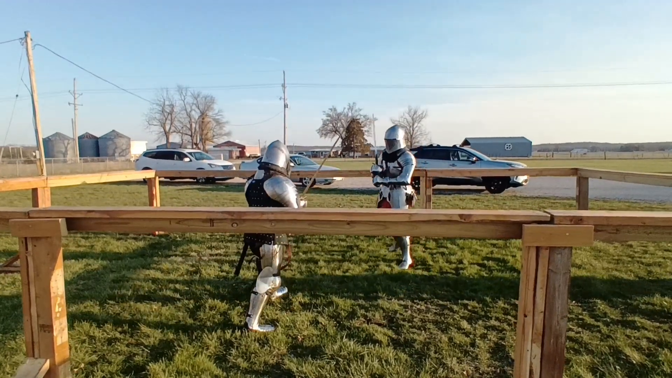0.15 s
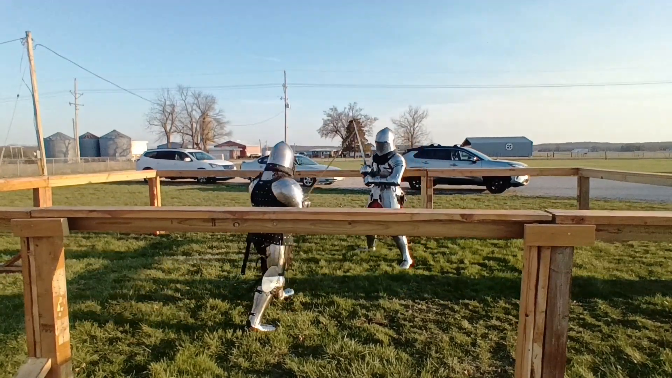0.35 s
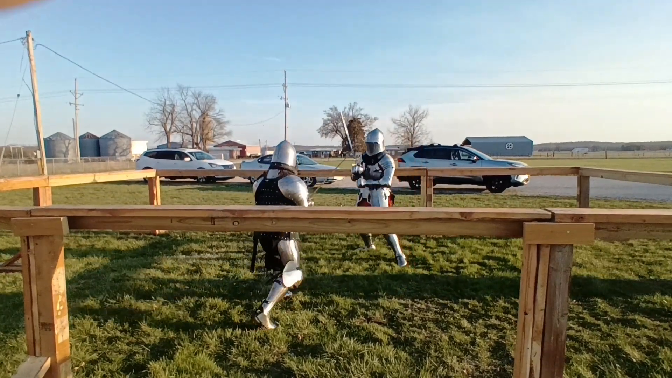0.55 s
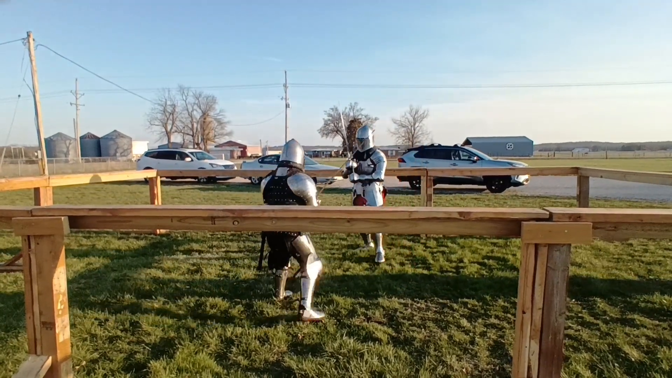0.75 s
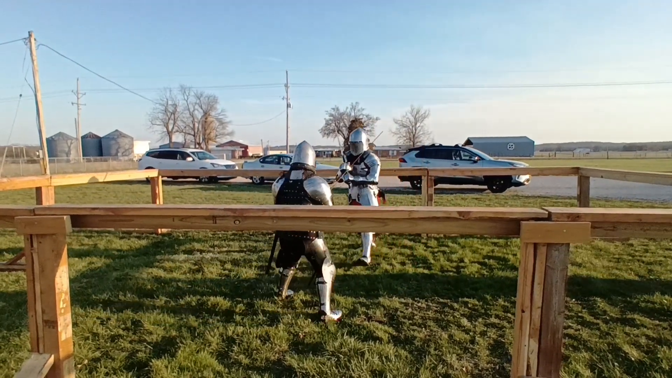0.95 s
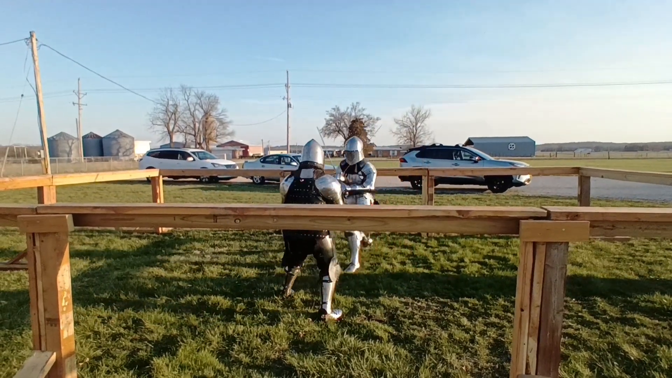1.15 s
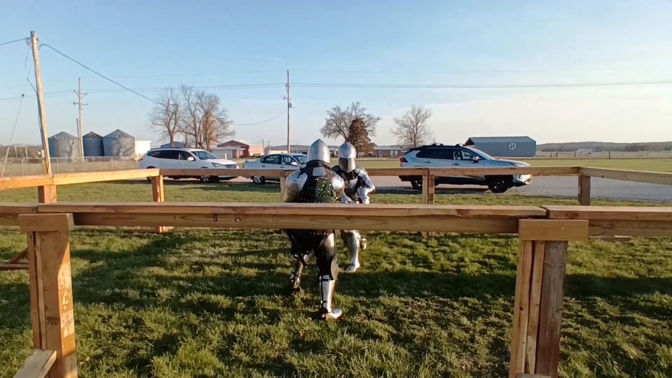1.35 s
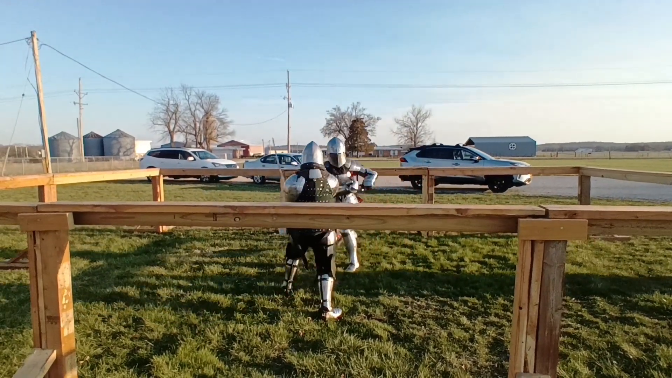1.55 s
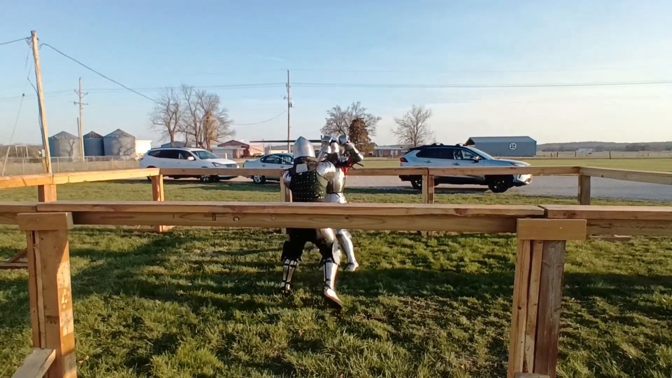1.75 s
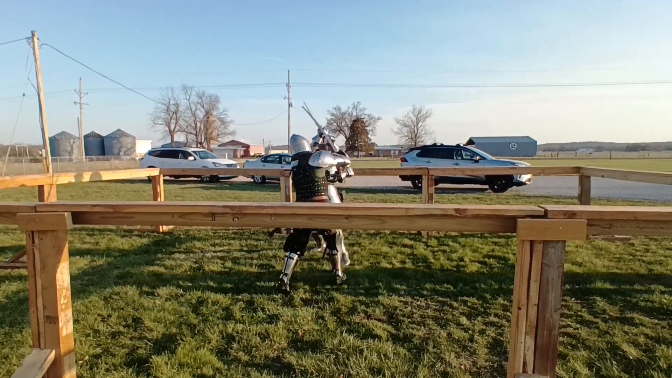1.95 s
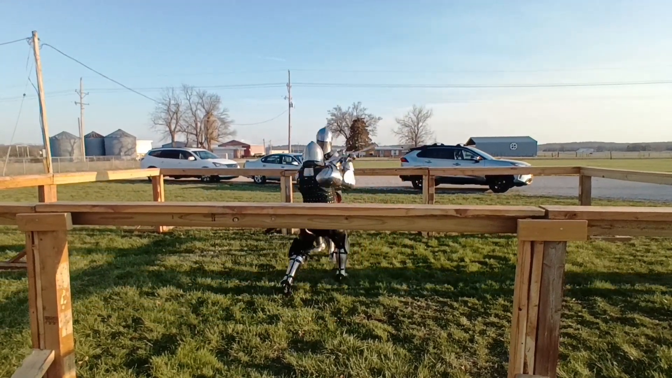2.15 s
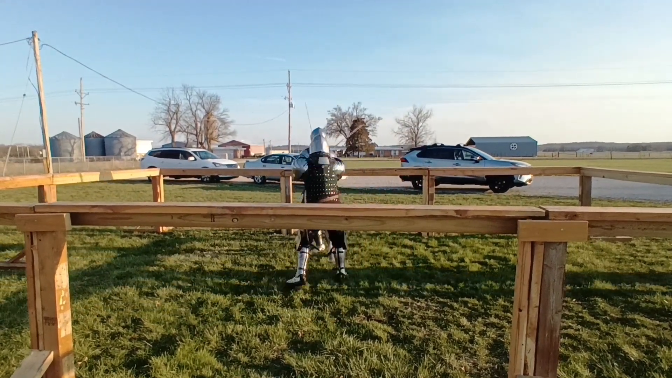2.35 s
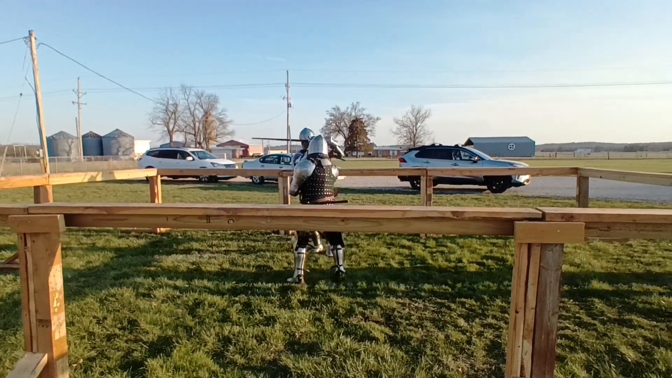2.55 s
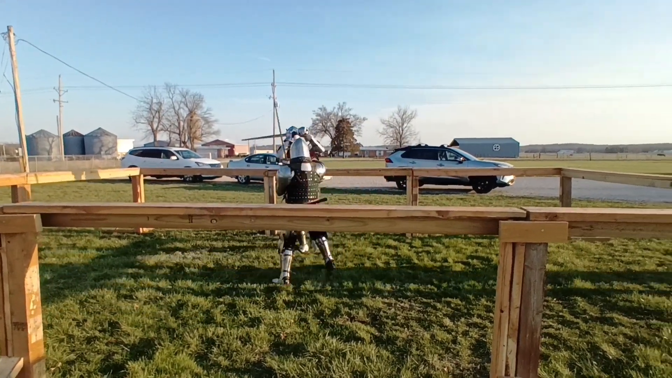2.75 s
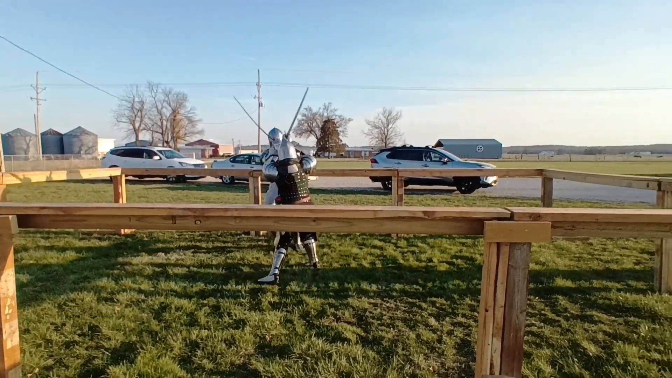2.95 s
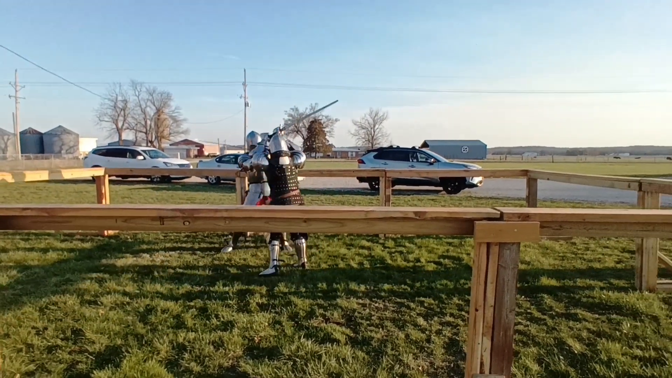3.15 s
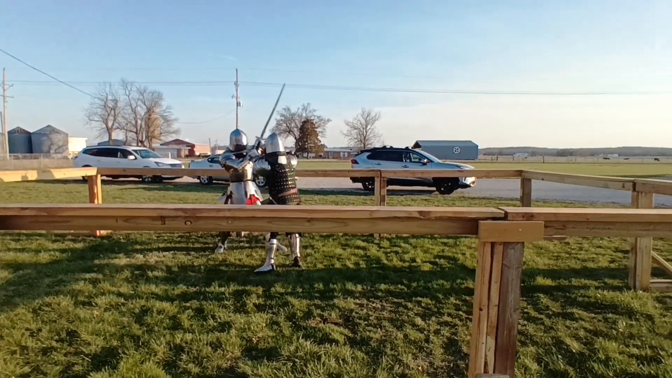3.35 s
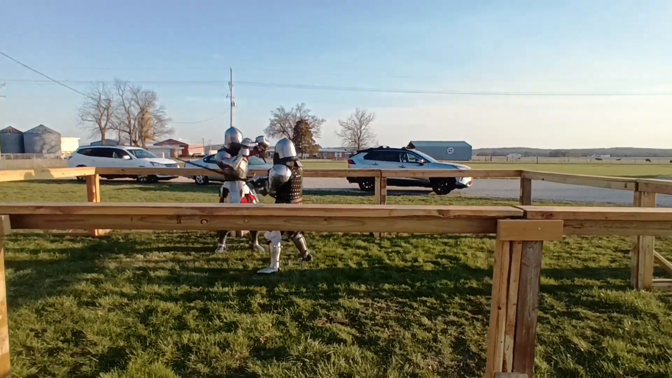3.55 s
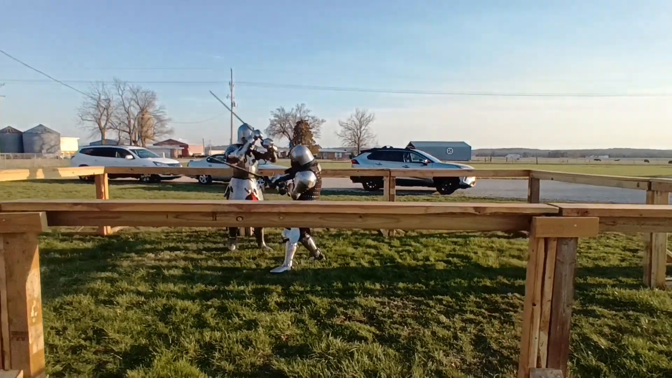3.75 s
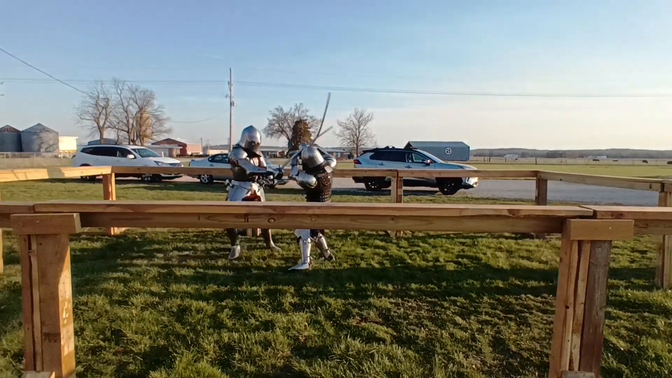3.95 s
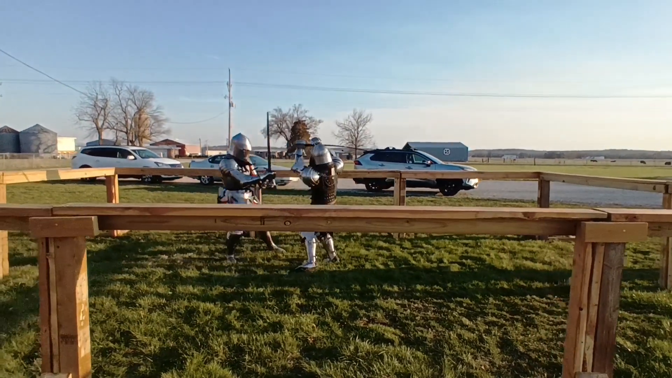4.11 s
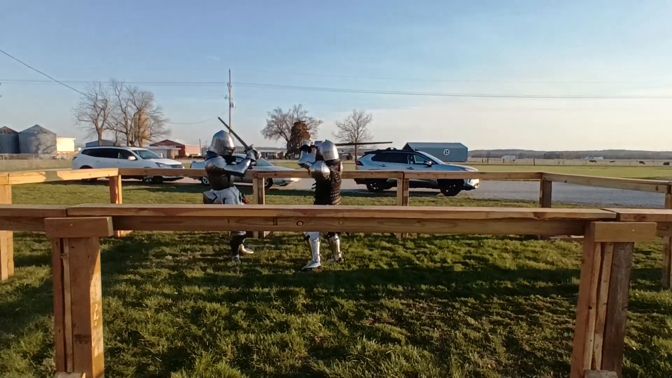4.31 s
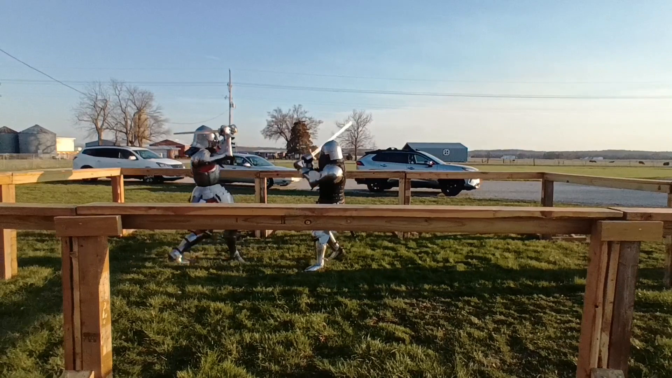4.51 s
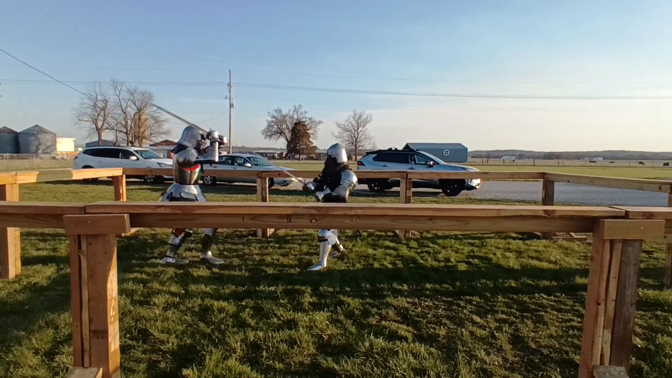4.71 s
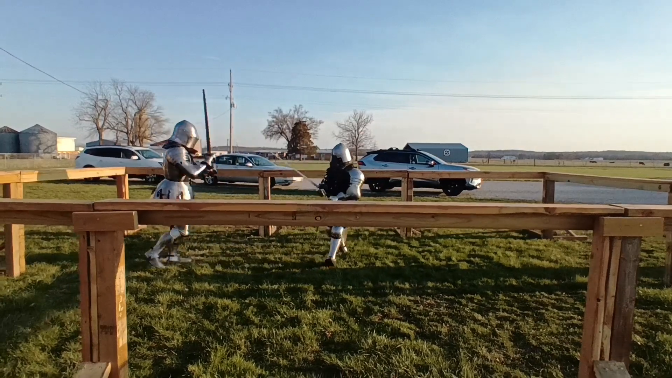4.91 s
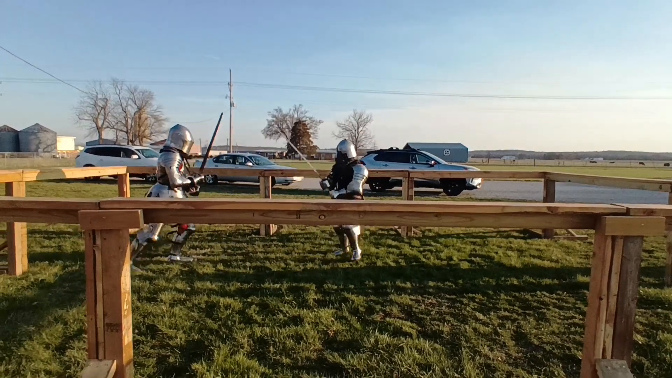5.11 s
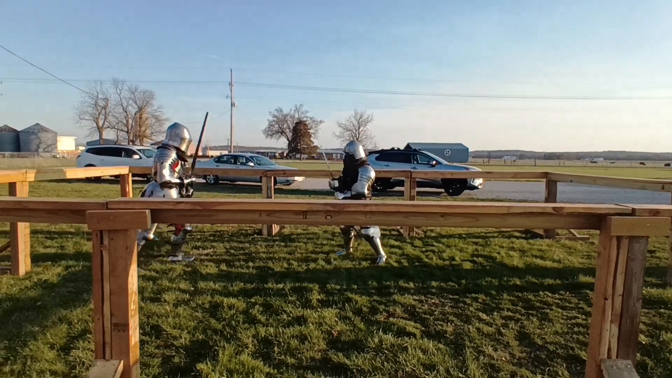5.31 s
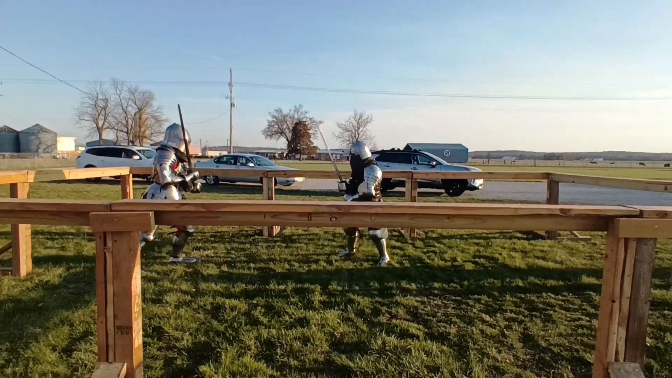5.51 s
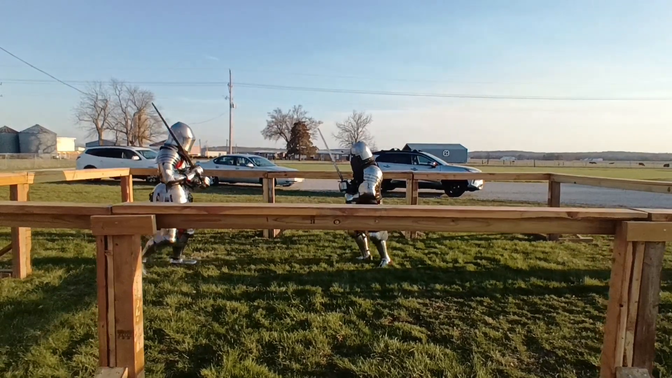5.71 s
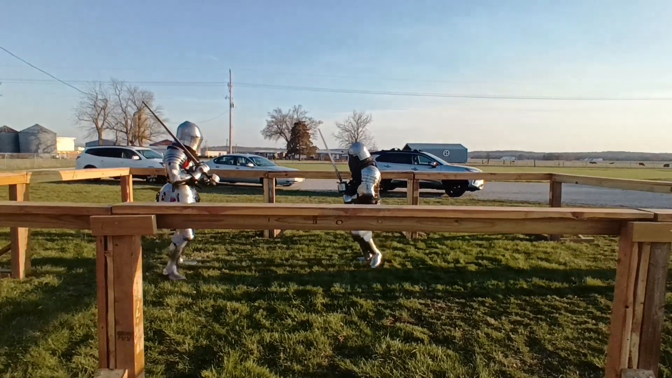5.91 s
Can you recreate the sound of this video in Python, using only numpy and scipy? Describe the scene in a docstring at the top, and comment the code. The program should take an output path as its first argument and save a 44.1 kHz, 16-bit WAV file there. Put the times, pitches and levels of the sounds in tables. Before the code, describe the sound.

Two people in steel armour fight with swords a few metres away on open grass. Light quick clinks start, a short lull of wind follows, then hard clashes and plate knocks crowd together, hardest around two seconds. Another dense flurry comes near four, a faint blade whine follows, and strikes thin out. Mail rustles throughout; handheld phone with low wind buffeting either side.

```python
"""Steel armour rustles and sword blades clash: two fighters spar on an open field, a few metres from a phone.
Mail, plates and buckles are flickering noise and short tones; blows are noise bursts through ringing modes.
Knocks wake the plates, small parts ring as fading sines, and a blade sliding on a plate whines on two partials.
Gusts of low noise and single pops buffet the two microphone ports one at a time.
The phone's gain dips just ahead of sudden loud sounds."""
import sys
import numpy as np
from scipy import signal
from scipy.fft import rfft, irfft, next_fast_len
from scipy.io import wavfile
from scipy.ndimage import uniform_filter1d, minimum_filter1d, map_coordinates

SR = 44100
rng = np.random.default_rng(int(sys.argv[2]) if len(sys.argv) > 2 else 0)


def to_wav(sig):
    """Store sig (one row per channel, or 1-D mono) as 16-bit WAV at the path in sys.argv[1].

    Samples outside -1..1 are clipped; the rate is SR.
    """
    pcm = np.clip(np.atleast_2d(sig), -1, 1) * 32767
    pcm = np.round(pcm).astype(np.int16)
    wavfile.write(sys.argv[1], SR, pcm.T)  # frames by channels


N = 267687

# how hard the armour moves: [t/s, mail level/dB, plates over mail/dB]
ARMOUR_MOTION = [(0, -29, -3), (0.1, -46, 4), (0.36, -58.5, -11), (0.6, -38, -12), (0.99, -46.5, -20),
                 (1.25, -37, -21.5), (1.51, -21, -9), (1.61, -30, -11), (2.06, -29, -14),
                 (2.25, -31.5, -13.5), (2.5, -19, -16.5), (2.83, -38, -16.5), (2.94, -33, -22.5),
                 (3.28, -34, -17.5), (3.42, -30, -20.5), (3.72, -36, -11.5), (3.85, -44, -3),
                 (4.02, -30, -12), (4.33, -30.5, -5.5), (4.48, -40, -12), (4.82, -32, -5), (4.95, -37, -10),
                 (5.28, -41.5, -23), (5.42, -49.5, -13.5), (5.88, -50.5, -15.5), (6.06, -45, -22.5)]
# padded bodies rub together in the grapple: [start t/s, rise/s, fall/s, top level/dB]
BODY_SCUFFS = [(1.3, 0.18, 0.17, -49.5), (1.621, 0.046, 0.32, -42.5), (2.06, 0.1, 0.2, -36),
               (2.3, 0.072, 0.19, -48), (2.9, 0.24, .25, -49.5), (3.36, 0.077, 0.18, -46.5),
               (3.58, 0.091, 0.097, -56), (3.84, 0.11, 0.04, -39.5), (4.12, 0.076, 0.12, -57),
               (4.45, 0.064, 0.075, -57), (4.74, 0.048, 0.063, -46)]
# the highest treble of the rustle swells for a while: [start t/s, end t/s, added level/dB]
RUSTLE_TREBLE_SWELL = (3.36, 4.45, 16.8)
# steel on steel: [t/s, clash level/dB, glint over clash/dB, time to fade 60 dB/ms]
SWORD_BLOWS = [(0.0146, -21, -16, 390), (0.0847, -17.5, -12, 67), (0.18, -30, -62, 64),
               (0.242, -30, -31, 9.9), (0.29, -27.5, -13, 28), (0.307, -33, -15, 26),
               (0.451, -17.5, -25, 62), (0.4683, -15.5, -16, 36), (0.484, -22.5, -29, 35),
               (0.5489, -18.5, -21, 65), (0.5732, -21.5, -20, 110), (1.2059, -22, -47, 120),
               (1.336, -14.5, -50, 115), (1.3811, -3.5, -28, 270), (1.403, 3, -20, 93),
               (1.4212, -11, -25, 77), (1.6574, -13, -34, 210), (1.8608, -18, -46, 39),
               (1.9256, -0.5, -33.5, 75), (1.997, -12.5, -43, 120), (2.1298, -14.5, -44, 180),
               (2.158, -15, -38, 300), (2.1876, -13, -28, 25), (2.2067, 3.5, -29, 135),
               (2.222, -5, -43, 80), (2.24, -4, -48, 177), (2.253, -5.5, -44, 29), (2.282, 4.5, -39, 26),
               (2.2881, -11.5, -45, 33), (2.4509, 9.5, -26, 140), (2.4674, -6, -37, 90),
               (2.54, -9.5, -35, 130), (2.6195, -17, -60, 350), (2.7157, -23, -48, 63),
               (2.8695, -26, -8, 49), (2.9032, -13, -54, 78), (2.947, -20.5, -48, 50),
               (3.1204, -17, -16, 120), (3.314, -21, -28, 170), (3.3405, -13.5, -20, 150),
               (3.384, -16.5, -19, 330), (3.417, -10.5, -20, 88), (3.4344, -12, -21, 22),
               (3.479, -14, -17, 86), (3.5358, -16.5, -24, 40), (3.634, -12.5, -21, 36),
               (3.6729, -25, -29, 130), (3.6993, -14.5, -36, 46), (3.747, -20, -9, 100),
               (3.762, -28, -20, 13), (3.786, -14, -29, 253), (3.941, -18, -18, 59),
               (3.9792, -4, -14.5, 185), (3.9935, -2.5, -23, 62), (4.0167, -7.5, -27, 120),
               (4.029, -10, -20, 22), (4.0557, -11.5, -25, 110), (4.111, -13.5, -17, 17),
               (4.142, -12.5, -35, 28), (4.173, -14.5, -31, 210), (4.2927, -20.5, -13, 100),
               (4.344, -23, -33, 130), (4.451, -41, -22, 25), (4.569, -20, -30, 49),
               (4.6075, -15, -33, 110), (4.6372, -12, -33, 190), (4.6796, -17, -34, 124),
               (4.7, -14, -35, 240), (4.729, -12, -29, 35), (4.783, -14.5, -16.5, 340),
               (4.805, -13.5, -21, 140), (5.003, -14, -38, 160), (5.209, -17.5, -42, 160),
               (5.253, -23.5, -31, 220), (5.5243, -31.5, -35, 180), (5.5438, -32.5, -45, 170),
               (5.746, -34.5, -34, 46), (6.0152, -25, -33, 30), (6.0276, -15.5, -29, 15)]
# knocks on the plates: [t/s, level/dB, most woken f/Hz, time to fade 60 dB/ms]
PLATE_KNOCKS = [(0.016, -16.5, 830, 33), (0.065, -24, 810, 50), (0.179, -42, 2050, 100),
                (0.261, -39.5, 770, 125), (0.448, -28, 1730, 69), (0.469, -32, 2000, 30),
                (0.492, -30, 1900, 25), (0.544, -25, 790, 142), (0.672, -36.5, 1350, 90),
                (1.205, -28, 1780, 29), (1.381, -15.5, 1080, 40), (1.401, -7, 954, 68),
                (1.478, -24.5, 726, 105), (1.566, -17, 2270, 33), (1.687, -21, 2000, 36),
                (1.711, -24, 1970, 52), (1.866, -29, 916, 30), (1.925, -7, 764, 16.7),
                (2.2075, -3, 750, 26.4), (2.37, -17.5, 1730, 49), (2.45, -0.5, 2000, 36),
                (2.469, -8.5, 1890, 25), (2.613, -23, 2200, 110), (2.72, -30.5, 2300, 114),
                (2.902, -15, 670, 62), (2.947, -20, 850, 67), (3.121, -31, 1380, 250),
                (3.339, -31, 2420, 210), (3.39, -28, 2110, 330), (3.477, -29, 1080, 145),
                (3.786, -16, 920, 63), (3.812, -23.5, 830, 220), (3.939, -23.5, 2000, 60),
                (3.978, -20.5, 960, 99), (4.137, -20, 854, 83), (4.171, -18.5, 890, 117),
                (4.233, -25, 1960, 83), (4.291, -33, 830, 78), (4.366, -28.5, 815, 160),
                (4.639, -30.5, 2280, 310), (4.714, -21, 2200, 78), (4.786, -19, 680, 244),
                (4.829, -30.5, 680, 130), (4.999, -20.5, 1060, 68), (5.259, -39, 890, 340),
                (5.326, -36, 820, 24), (5.55, -45.5, 1880, 85), (5.748, -48.5, 774, 170),
                (5.949, -46, 820, 200)]
# wind on one microphone port: [start t/s, rise/s, fall/s, top level/dB, port L or R]
WIND_GUSTS = [(0.372, 0.059, 0.048, -26.5, "R"), (.47, 0.041, 0.19, -35.5, "R"), (.57, .05, 0.52, -42, "L"),
              (.64, 0.077, 0.34, -21.5, "R"), (.8, 0.24, 0.17, -23, "R"), (1.05, 0.19, .05, -50, "L"),
              (1.259, 0.068, 0.057, -26.5, "L"), (1.381, 0.19, 0.17, -20.5, "R"),
              (1.728, 0.11, 0.082, -33, "L"), (2.02, 0.11, 0.067, -39.5, "R"), (2.05, 0.13, .07, -49, "L"),
              (2.15, 0.041, 0.022, -45, "R"), (2.8, 0.037, 0.042, -48, "L"), (2.31, 0.061, 0.056, -23, "R"),
              (2.408, 0.06, 0.16, -38, "L"), (2.55, 0.22, .05, -59, "R"), (2.7, 0.13, 0.029, -28, "L"),
              (2.82, 0.23, 0.32, -18, "R"), (2.95, 0.18, 0.14, -47, "L"), (3.54, 0.15, 1, -27, "L"),
              (4.11, 0.024, 0.31, -43, "L"), (4.199, 0.095, 0.4, -38, "L"), (4.36, 0.18, 0.24, -19.5, "R"),
              (4.2, 0.08, 0.075, -44, "R"), (4.999, 0.28, 0.1, -24, "R"), (5.208, 0.089, 0.07, -30.5, "L"),
              (5.362, 0.032, 0.11, -27.5, "R"), (5.73, 0.076, 0.059, -35.5, "R"),
              (5.72, 0.056, 0.11, -58, "L"), (5.89, 0.057, 0.05, -47, "L"),
              (5.95, 0.054, 0.067, -33.5, "R")]
# small steel parts left ringing on one clear tone: [t/s, f/Hz, level/dB, time to fade 60 dB/s]
PART_PINGS = [(0.885, 3320, -59, 1), (1.008, 1920, -50, 0.2), (1.166, 1337, -45.5, 0.15),
              (3.812, 780.4, -35.5, 0.68), (3.812, 1410, -36, 0.29), (4.71, 2290, -26.5, 0.29)]
# pops of wind on the right port: [t/s, peak level/dB, length of the swing/ms]
WIND_POPS = [(0.977, -10.5, 3.46), (2.411, -15, 3.4), (2.865, -18, 4.8), (3.034, -24, 5.6),
             (3.084, -16.5, 3.3)]
# partials of the sliding blade, lowest first: [loudest t/s, level/dB, fade either side/(dB/s)]
WHINE_PARTIALS = [(4.72, -36, 80), (4.92, -38, 55)]
# the phone turns to follow the bout: [t/s, left port hears later by/ms]
PHONE_TURN = [(0, 0.026), (2.5, 0), (3.2, 0.13), (4.2, 0.13), (6.07, 0.18)]

# spectrum of the mail: [f/Hz, relative level per Hz/dB]
MAIL_COLOUR = [(1760, -36), (3000, -41), (4000, -10), (4490, -4.5), (6200, 4.5), (7030, -1.5), (8550, -25),
               (10000, -30.5), (13000, -41), (22000, -120)]
# spectrum of the armour plates: [f/Hz, relative level per Hz/dB]
PLATE_COLOUR = [(290, -48), (500, -8), (913, -1.5), (1090, -11.5), (1430, 0.5), (1710, -1), (1890, 4),
                (3500, -1.5), (4550, -30), (7700, -120)]
# spectrum of the padding under the armour: [f/Hz, relative level per Hz/dB]
PADDING_COLOUR = [(120, -32.5), (200, -28), (367, -4.5), (425, -9), (535, -25), (600, -26.5), (780, -69.5),
                  (1320, -120)]
# spectrum of the glint, the highest treble of the steel: [f/Hz, relative level per Hz/dB]
GLINT_COLOUR = [(5290, -58.5), (9000, -0.5), (10400, -2.5), (11800, -7.5), (13400, -12), (15100, 15),
                (16000, 1.5), (16400, -20)]
# spectrum of the broad crash of a blow: [f/Hz, relative level per Hz/dB]
CLASH_COLOUR = [(1530, -53.5), (2600, -11.5), (3470, -6), (3820, -1.5), (4310, -1.5), (4600, 3),
                (5260, -1.5), (6750, 6.5), (7060, -0.5), (8880, -27.5), (12000, -40), (15600, -53),
                (22000, -120)]
# spectrum of strong wind at a port: [f/Hz, relative level per Hz/dB]
WIND_COLOUR = [(25, -51.5), (70, -1), (118, -1), (172, -4.5), (213, -7.5), (242, -12), (452, -41),
               (500, -69), (650, -69), (1100, -120)]
# modes of the armour plates: [f/Hz, relative level/dB, time to fade 60 dB/s]
ARMOUR_MODES = [(776.3, -1, 0.19), (830, 6, 0.092), (916, -5, 0.13), (1080, 1, 0.049), (1211, -2.5, 0.17),
                (1372, 2, 0.12), (1743, 0, 0.12), (1851, -29, 0.041), (2000, 2, 0.053), (2273, 9.5, 0.1),
                (2300, -5, .035), (2848, 10.5, 0.08)]
# modes of the sword blades: [f/Hz, relative level/dB, time to fade 60 dB/s]
BLADE_MODES = [(3720, -3, .07), (3914, -2, .05), (4700, 3, .04), (5490, 5, .05), (5590, 5, .07),
               (6260, 6, .05), (6550, 7, .05), (6850, 12, .06), (7390, 5, .05), (7490, 3, .06)]

# glint and padding follow the motion: level at middle motion, dB gained per dB of motion
MOTION_MID_DB = -35
GLINT_MID_DB, GLINT_SLOPE = -66, 0.62
PADDING_MID_DB, PADDING_SLOPE = -69, 0.83
TREBLE_EDGE_S = 0.089
# small parts: rate, pitch range, mean ring time to -60 dB, level over mail
JINGLES_PER_S, JINGLE_LO_HZ, JINGLE_HI_HZ = 160, 1193, 7500
JINGLE_RING_S, JINGLE_OVER_MAIL_DB = 0.081, -10.5
# scatter of their strengths, widest difference between ports, rise with pitch
JINGLE_SPREAD_DB, JINGLE_PAN_DB, JINGLE_TILT_DB_PER_OCTAVE = 5.5, 23.5, 4.5
STUTTER_DB = 4  # roughness of the scrape in a blow
KNOCK_FOCUS_DB = 18  # how far a knock holds down modes away from its pitch
CALM_DB, SWELL_SHAPE = -68, 2.78  # air between gusts; exponent, higher makes narrower swells
# the whine as a blade slides along a plate
SLIDE_START_S, SLIDE_END_S, SLIDE_EDGE_S = 4.63, 5.28, 0.026
SLIDE_HZ, SLIDE_LIFT_HZ = 810, 70
TOP_HZ = 16100  # the phone passes nothing much above


def undb(db):
    """Decibels to gain."""
    return 10 ** (np.asarray(db) / 20)


def unit(x):
    """Scale to rms 1."""
    return x / np.sqrt(np.mean(x ** 2))


def curves(table):
    """Columns of a table as curves over time."""
    s, *columns = np.transpose(table)
    return [np.interp(np.arange(N) / SR, s, column) for column in columns]


def colour(points, size=2048):
    """Causal response with the given spectrum, from the folded cepstrum; white noise keeps its level."""
    hz, db = np.transpose(points)
    grid = np.maximum(np.arange(size // 2 + 1), 1) * SR / size
    slope_db = -24 * np.maximum(np.log2(grid / hz[-1]), 0)  # 24 dB per octave past the last point
    spectrum_db = np.interp(np.log(grid), np.log(hz), db) + slope_db
    cepstrum = irfft(np.log(undb(spectrum_db)))
    cepstrum[1:size // 2] *= 2
    cepstrum[size // 2 + 1:] = 0
    taps = irfft(np.exp(rfft(cepstrum)))
    return taps / np.sqrt(np.sum(taps ** 2))


def through(x, taps):
    """Both channels through one response."""
    return signal.fftconvolve(x, taps[None], axes=1)[:, :x.shape[1]]


def pair(size, alike):
    """Noise for both ports, with a share of its power in common."""
    noise = rng.standard_normal((3, size))
    return np.sqrt(alike) * noise[0] + np.sqrt(1 - alike) * noise[1:]


def walk(rate, size=N):
    """Random levels, one every 1 / rate s, joined by straight slopes; spread a little under 1."""
    hold = int(SR / rate)
    steps = np.repeat(rng.standard_normal(size // hold + 1), hold)
    return uniform_filter1d(steps, hold)[:size]


def span(start_s, end_s, edge_s):
    """Fades in after the start and out before the end; 1 between."""
    t = np.arange(N) / SR
    return np.clip(np.minimum(t - start_s, end_s - t) / edge_s, 0, 1)


def swell(start_s, rise_s, fall_s, db):
    """Rises smoothly to a peak and dies away."""
    t = np.arange(N) / SR - start_s
    place = np.minimum(t / rise_s, (rise_s + fall_s - t) / fall_s)
    return undb(db) * np.sin(np.pi / 2 * np.clip(place, 0, 1)) ** SWELL_SHAPE


def clinks(rate, spread_db, fade_ms):
    """Envelope of small contacts at random moments: each starts at once and dies away."""
    strengths = undb(spread_db * np.minimum(rng.exponential(size=N), 2))
    hits = (rng.random(N) < rate / SR) * strengths
    keep = undb(-60 / (fade_ms * SR / 1000))  # per sample
    return unit(signal.lfilter([1], [1, -keep], hits))


def patches(x, lo_hz, hi_hz, patchy_db, rate, count):
    """Different parts move at different moments: each slice of the spectrum flickers on its own."""
    size = next_fast_len(N, real=True)
    spectrum = rfft(x, size)
    hz = np.arange(size // 2 + 1) * SR / size
    octave_share = np.log(np.maximum(hz, 1) / lo_hz) / np.log(hi_hz / lo_hz)
    place = np.clip(octave_share, 0, 1) * (count - 1)
    out = np.zeros((2, N))
    for k in range(count):
        band = np.maximum(1 - np.abs(place - k), 0)
        out += irfft(spectrum * band, size)[:, :N] * undb(patchy_db * walk(rate))
    return out


def ring(modes, scatter_db, detune, near_hz=1000, focus_db=0, longest_s=1):
    """One blow on a set of modes: those near the given pitch wake most, the rest by chance."""
    hz, db, t60 = np.transpose(modes)[:, :, None]
    chance = rng.standard_normal((2, len(modes), 1))
    t60 = np.minimum(t60, longest_s)
    away = np.minimum(np.abs(np.log2(hz / near_hz)) / 0.2, 1)  # full at a fifth of an octave
    db = db + scatter_db * chance[0] - focus_db * away
    t = np.arange(SR // 10) / SR
    fade = undb(db - 60 * t / t60 + 2 * walk(180, size=len(t)))
    taps = np.sum(fade * np.sin(2 * np.pi * hz * (1 + detune * chance[1]) * t), axis=0)
    return taps / np.sqrt(np.sum(taps ** 2))


def jingles():
    """Rings, rivets and buckles touch at random moments; each sounds one short tone of its own."""
    size = SR // 12
    out, t = np.zeros((2, N + size)), np.arange(size) / SR
    for when, pitch, strength, ring_share, side in rng.random((int(JINGLES_PER_S * N / SR), 5)):
        hz = JINGLE_LO_HZ * (JINGLE_HI_HZ / JINGLE_LO_HZ) ** np.sqrt(pitch)  # high tones are commoner
        db = JINGLE_SPREAD_DB * min(-np.log(1 - strength), 2)
        db += JINGLE_TILT_DB_PER_OCTAVE * np.log2(hz / JINGLE_HI_HZ)
        ring_s = JINGLE_RING_S * (.5 + ring_share)
        tone = np.sin(2 * np.pi * hz * t) * undb(db - 60 * t / ring_s)
        ports = undb(JINGLE_PAN_DB * (side - .5) * np.array([[1], [-1]]))
        start = int(when * N)
        out[:, start:start + size] += tone * ports
    return out[:, :N]


def rustle():
    """Many tiny contacts in mail and straps: noise that flickers in grains, over the rub of padding."""
    mail_db, plates_db = curves(ARMOUR_MOTION)
    motion_db = mail_db - MOTION_MID_DB
    swell_start_s, swell_end_s, swell_db = RUSTLE_TREBLE_SWELL
    glint_db = GLINT_MID_DB + GLINT_SLOPE * motion_db
    glint_db = glint_db + swell_db * span(swell_start_s, swell_end_s, TREBLE_EDGE_S)
    rub = undb(PADDING_MID_DB + PADDING_SLOPE * motion_db) + sum(swell(*scuff) for scuff in BODY_SCUFFS)
    stir_db = 2.2 * walk(30)  # shared by all the steel

    mail_grain = undb(stir_db + 0.71 * walk(300)) * (1 + 0.39 * clinks(90, 6.5, 52))
    mail = through(pair(N, 0.049) * mail_grain, colour(MAIL_COLOUR))
    mail = patches(mail, 3850, 7000, 5.2, 45, count=5)

    plate_grain = undb(stir_db + 1.8 * walk(80)) * (1 + 0.42 * clinks(31, 1.6, 44))
    taps = pair(N, 0.35) * plate_grain
    plates = through(taps, colour(PLATE_COLOUR)) + undb(-6.5) * through(taps, ring(ARMOUR_MODES, 0, 0))
    plates = patches(plates, 687, 3000, 3.3, 25.1, count=6)

    glint = through(pair(N, .4) * undb(stir_db + 5.6 * walk(80)), colour(GLINT_COLOUR))
    glint *= undb([[3.], [-3.]])  # stronger on the left port
    padding = through(pair(N, .9) * undb(4.5 * walk(40)), colour(PADDING_COLOUR))

    out = unit(padding) * rub
    out += unit(mail) * undb(mail_db)
    out += unit(plates) * undb(mail_db + plates_db)
    out += unit(glint) * undb(glint_db)
    return out + unit(jingles()) * undb(mail_db + JINGLE_OVER_MAIL_DB)


def blows():
    """Steel meets steel: a sharp start, a stuttering scrape, then the rattle fades as the blades ring a little."""
    size = SR // 5
    out, t = np.zeros((2, N + size)), np.arange(size) / SR * 1000  # t in ms
    clash_taps, glint_taps = colour(CLASH_COLOUR), colour(GLINT_COLOUR)
    for s, db, glint_db, fade_ms in SWORD_BLOWS:
        scrape_ms = 0.068 * fade_ms  # long rattles start with a longer scrape
        touch_ms = 0.18 + 0.033 * max(-db, 0)  # light touches start softer
        rise = (1 - np.exp(-t / touch_ms)) * (1 + 0.45 * np.exp(-t / 3.2))  # a crack at first touch
        smooth = rise * undb(-60 * np.maximum(t - scrape_ms, 0) / fade_ms)
        contact = smooth * undb(STUTTER_DB * walk(370, size=size))
        # the stutter shares out the force, it adds none
        contact *= np.linalg.norm(smooth) / np.linalg.norm(contact)
        push = pair(size, 0.25) * contact
        # the broad crash soon drops to about half; the blades sing on while the scrape lasts
        crash = through(push * (0.51 + 0.54 * undb(-1.5 * t)), clash_taps)
        blades = through(push, ring(BLADE_MODES, 4.3, 0.0058))
        glint = through(pair(size, 0.22) * contact * undb(-.25 * t), glint_taps)
        # the left port is more open to the highest treble
        glint *= undb(glint_db + 2.0 + np.array([[0], [-9.]]))
        sound = undb(-9.0) * crash + undb(-14.0) * blades + glint
        start = int(s * SR)
        out[:, start:start + size] += sound * undb(db + np.array([[-.6], [.6]]))
    return out[:, :N]


def knocks():
    """A short crunch on the plates, fuller in hard knocks, that leaves a few quickly damped modes."""
    size = SR // 4
    out, t = np.zeros((2, N + size)), np.arange(size) / SR * 1000  # t in ms
    plate_taps, padding_taps = colour(PLATE_COLOUR), colour(PADDING_COLOUR)
    for s, db, hz, fade_ms in PLATE_KNOCKS:
        fade = undb(-60 * t / fade_ms + 1.3 * walk(230, size=size))
        push = pair(size, 0.89) * (1 - np.exp(-t / 0.82)) * fade
        # a short knock damps the plate
        modes = ring(ARMOUR_MODES, 1.9, 0.032, hz, KNOCK_FOCUS_DB, longest_s=fade_ms / 1000)
        sound = undb(0.16 * db - 5) * through(push, plate_taps)
        sound += undb(-4) * through(push, modes)
        # hard knocks thump the padded body
        sound += undb(db - 14) * through(push * undb(-.8 * t), padding_taps)
        start = int(s * SR)
        out[:, start:start + size] += sound * undb(db)
    return out[:, :N]


def gusts():
    """Each gust blows on one port, over calm air."""
    ports = [sum(swell(*gust[:-1]) for gust in WIND_GUSTS if gust[-1] == port) for port in "LR"]
    return undb(CALM_DB) + np.array(ports)


def wind():
    """Eddies burst on each port alone; stronger gusts reach higher in pitch."""
    strength = gusts()
    bursts = np.array([clinks(31, 3.6, 60), clinks(25, 4.5, 60)])
    eddies = pair(N, 0) * undb([1.4 * walk(27), 6.5 * walk(45)]) * (1 + 0.5 * bursts)
    bright = unit(through(eddies, colour(WIND_COLOUR, size=8192)))
    dull = unit(signal.sosfilt(signal.butter(2, 110, fs=SR, output="sos"), bright))
    share = np.clip(strength / undb(-23), 0, 1)
    return strength * (share * bright + (1 - share) * dull)


def pings():
    """A struck small part rings on one clear, fading tone that stops within a seventh of a second."""
    out, t = np.zeros(N), np.arange(SR // 7) / SR
    for s, hz, db, ring_s in PART_PINGS:
        edges = np.clip(np.minimum(t / .003, (t[-1] - t) / .02), 0, 1)
        tone = np.sin(2 * np.pi * hz * t) * edges
        start = int(s * SR)
        out[start:start + len(t)] += undb(db - 60 * t / ring_s) * tone
    return out


def pops():
    """A single eddy slaps the right port: one swing of pressure, the return slower."""
    out, t = np.zeros((2, N)), np.arange(SR // 25) / SR * 1000  # t in ms
    for s, db, ms in WIND_POPS:
        place = t / ms
        envelope = place * np.exp(-1.6 * place) * np.minimum(place, 1)
        swing = np.sin(2 * np.pi * place ** .75) * envelope
        start = int(s * SR)
        out[1, start:start + len(t)] += undb(db) * swing / np.max(np.abs(swing))
    return out


def slide():
    """Stick-slip whine: two wavering partials, broken up by the grain of the steel; the pitch lifts at the end."""
    length_s = SLIDE_END_S - SLIDE_START_S
    since = np.clip(np.arange(N) / SR - SLIDE_START_S, 0, length_s)
    hz = SLIDE_HZ + SLIDE_LIFT_HZ * (since / length_s) ** 6
    phase = 2 * np.pi * np.cumsum(hz * (1 + .045 * walk(300))) / SR
    grip = undb(5 * walk(60))
    partials = np.zeros(N)
    for number, (s, db, fade) in enumerate(WHINE_PARTIALS, start=1):
        level = undb(db - fade * np.abs(SLIDE_START_S + since - s))
        partials += level * np.sin(number * phase)
    return span(SLIDE_START_S, SLIDE_END_S, SLIDE_EDGE_S) * grip * partials


def scene():
    """The bout reaches the left port a little later; wind strikes the ports directly."""
    bout = rustle() + blows() + knocks() + pings() + slide()
    late = np.arange(N) - curves(PHONE_TURN)[0] * SR / 1000
    bout[0] = map_coordinates(bout[0], [late], order=3)
    return bout + wind() + pops()


def record(dry):
    """Gain control that looks a few ms ahead and dips just before a sudden loud sound; a quick limiter; top cut."""
    ahead = SR // 130
    # judged on the slope of the wave, so treble counts most
    slope_power = np.mean(np.diff(dry, prepend=0) ** 2, axis=0)
    now = np.sqrt(uniform_filter1d(slope_power, SR // 400) + 1e-12)
    coming = -minimum_filter1d(-now, ahead, origin=-(ahead // 2))  # loudest just ahead
    allowed = np.maximum(undb(13) * now, undb(-30))
    gain = np.clip(allowed / coming, .15, 1)
    wet = dry * uniform_filter1d(gain, SR // 2000)
    peak = -minimum_filter1d(-np.abs(wet), SR // 400)
    wet = wet * uniform_filter1d(np.minimum(.98 / peak, 1), SR // 400)
    return signal.sosfilt(signal.ellip(10, .2, 80, TOP_HZ, fs=SR, output="sos"), wet)


dry = scene()
out = record(dry)
to_wav(out)
```